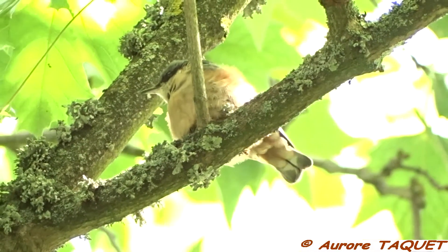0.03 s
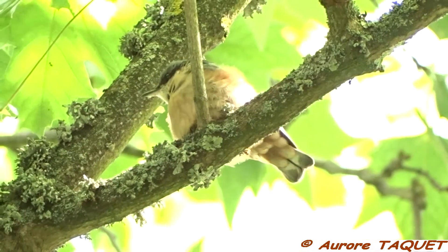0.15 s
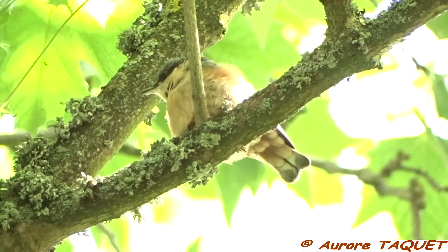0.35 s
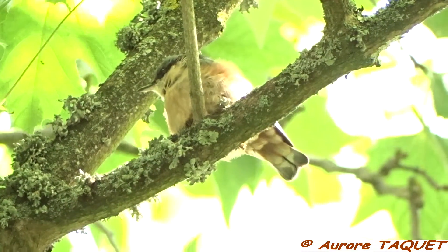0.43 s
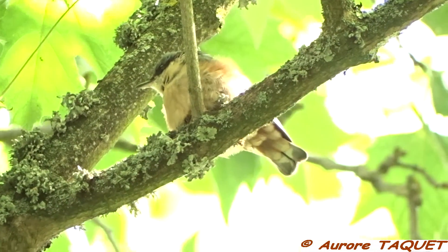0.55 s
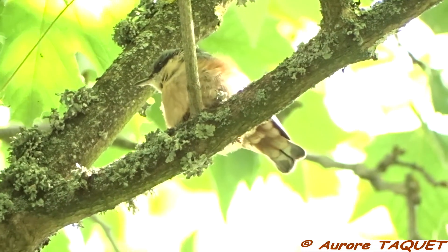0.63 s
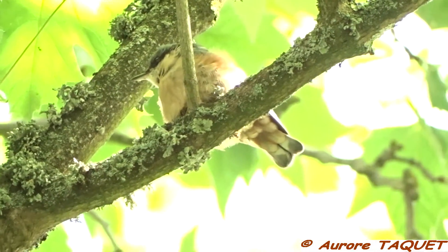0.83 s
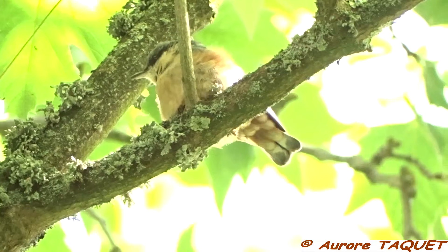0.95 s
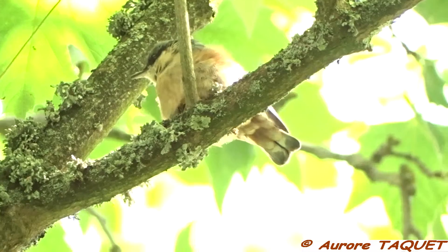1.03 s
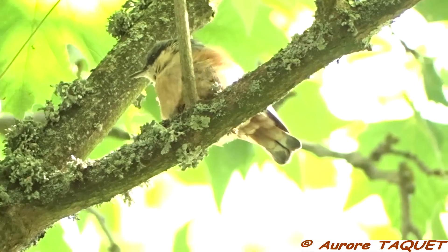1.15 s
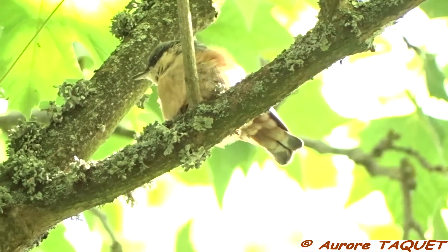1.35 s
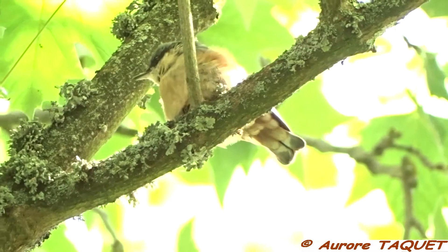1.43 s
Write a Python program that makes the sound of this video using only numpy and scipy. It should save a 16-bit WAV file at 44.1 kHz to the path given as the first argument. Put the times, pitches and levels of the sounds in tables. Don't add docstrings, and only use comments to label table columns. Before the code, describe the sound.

In a leafy tree, faint falling whistles lead to brief chirps and clear, trembling high whistles from several birds, with a short diffuse echo; afterwards mostly quiet hum, far traffic and low wind rumble remain outdoors.

```python
import sys
import numpy as np
from scipy import signal
from scipy.fft import rfft, irfft
from scipy.io import wavfile
from scipy.ndimage import uniform_filter1d

SR = 44100
rng = np.random.default_rng(int(sys.argv[2]) if len(sys.argv) > 2 else 0)


def volts(x):
    e = np.asarray(x, float) / 20
    return 10 ** e


def master(y):
    cut = np.clip(np.atleast_2d(y).T, -1, 1)
    pcm = np.round(cut * 32767)
    wavfile.write(sys.argv[1], SR, pcm.astype(np.int16))


N = 66150

# (start [s], length [s], top pitch [Hz], level [dB])
LONG_CHIRPS = [
    (.450, .078, 5450, -43),
    (.827, .074, 5460, -42),
]
# (start [s], length [s], top pitch [Hz], level [dB])
UPPER_CHIRPS = [
    (.196, .056, 6200, -52),
    (.464, .050, 6560, -51),
    (.846, .045, 6400, -56),
]
# (start [s], length [s], top pitch [Hz], level [dB])
SHORT_CHIRPS = [
    (.360, .024, 5150, -53),
    (.373, .028, 7250, -55),
    (.738, .023, 5250, -47),
    (1.486, .027, 5200, -50),
    (.169, .021, 6550, -54),
    (.437, .023, 6600, -54),
    (.810, .032, 6950, -57),
    (.918, .032, 5450, -54),
    (.876, .030, 5900, -55),
]
# (start [s], length [s], first pitch [Hz], last pitch [Hz], level [dB])
GLIDING_WHISTLES = [(.012, .022, 8500, 7950, -58), (.032, .030, 7950, 7550, -63),
                    (.113, .013, 7550, 6950, -60), (.122, .015, 7150, 5500, -59),
                    (.170, .026, 8150, 7880, -57), (.194, .062, 7850, 7680, -63),
                    (.418, .020, 8620, 8500, -56), (.770, .010, 5600, 5800, -60),
                    (.838, .012, 5500, 5750, -53), (.828, .016, 8100, 7450, -53),
                    (.724, .016, 8200, 8250, -60), (.875, .015, 9100, 9250, -59),
                    (.886, .012, 8950, 8750, -54), (.814, .010, 5600, 5800, -56),
                    (.896, .035, 8550, 8480, -47), (.884, .012, 7800, 8000, -54),
                    (.938, .030, 8250, 8050, -53), (.960, .010, 6750, 6700, -59)]
# (start [s], length [s], first pitch [Hz], last pitch [Hz], level [dB])
HOARSE_NOTES = [
    (.876, .075, 9150, 9000, -56),
    (.882, .075, 8750, 8350, -52),
    (.815, .060, 6300, 5700, -53),
    (.860, .090, 6500, 5500, -54),
]
# (time [s], pitch [Hz],
# level [dB])
CONTOUR_CALLS = [
    [(.182, 3300, -57), (.190, 4750, -55), (.202, 5220, -53), (.220, 5370, -49), (.244, 5400, -49),
     (.252, 5150, -58), (.262, 4400, -66)],
    [(.520, 8100, -56), (.526, 8020, -51), (.545, 7870, -45.5), (.565, 7960, -55.5), (.588, 8070, -43),
     (.603, 7950, -47.5), (.608, 7600, -60), (.614, 6700, -67)],
    [(.748, 7560, -64), (.770, 7570, -51), (.786, 7950, -44), (.800, 8080, -41), (.827, 8180, -42),
     (.833, 8200, -54), (.868, 8230, -52), (.876, 8200, -62)],
    [(.966, 7550, -59), (.973, 7555, -48), (1.001, 7580, -49.5), (1.017, 7850, -38.5), (1.043, 8110, -38.5),
     (1.065, 8050, -35), (1.082, 7850, -39), (1.087, 7400, -44), (1.094, 6500, -57)],
]
# (time [s], level [dB])
GUST_LEVEL = [(0.0, -74), (0.132, -62), (0.22, -60), (0.246, -68), (0.33, -44), (0.404, -59.5),
              (0.434, -78), (0.462, -63), (0.5, -56.5), (0.76, -65.5), (0.78, -70), (0.944, -70),
              (1.076, -47.5), (1.168, -50.5), (1.186, -47), (1.328, -50), (1.362, -65), (1.5, -56)]
# (time [s], peak level [dB], pitch [Hz])
PRESSURE_PUFFS = [(0.33, -45.5, 73.5), (.434, -52.5, 40), (0.513, -56, 50), (0.204, -56, 79),
                  (.710, -57, 56), (0.858, -53, 78.5), (.617, -54, 60), (0.788, -51, 69),
                  (1.064, -48.5, 55), (1.098, -48.5, 90), (1.197, -46, 142), (1.234, -47, 126),
                  (1.310, -71, 71)]
# (time [s], level [dB])
DRONE_SWELL = [
    (0.0, -69.5),
    (0.036, -67),
    (0.434, -66.5),
    (0.534, -61),
    (0.684, -64),
    (0.888, -59),
    (1.5, -60.5),
]
# (frequency [Hz], density [dB per Hz])
HUM_SPECTRUM = [(30, -5), (106, -7), (400, -13), (1200, -6.5), (1600, -7.5), (2100, -13.5), (6000, -13.5),
                (11000, -22.5)]
# (frequency [Hz], correlation [0..1])
HUM_LIKENESS = [(60, 1), (300, 1), (1000, 0.51), (3000, 0.61), (8000, 0.83)]
# (frequency [Hz], left minus right [dB])
HUM_BALANCE = [(60, 3.5), (220, -1), (820, 2.5), (3030, -2), (11200, -2)]

TIME = np.arange(N) / SR
OPPOSED = np.array([[1], [-1]])
TREMBLE_PER_S = 110
NOTE_EDGE_S = .004
MICROPHONE_TOP_HZ = 11020


def rms_one(x):
    return x / np.sqrt(np.mean(x ** 2) + 1e-20)


def drift(rate):
    r = np.exp(-2 * np.pi * rate / SR)
    noise = rng.standard_normal(N + 9000)
    return rms_one(signal.lfilter([1], [1, -2 * r, r * r], noise)[9000:])


def fade(t, length, edge_s):
    onset = np.sin(np.pi / 2 * np.clip(t / edge_s, 0, 1))
    release = np.sin(np.pi / 2 * np.clip((length - t) / edge_s, 0, 1))
    return onset * release


def whistle(hz, gain, wobble_hz):
    phase = 2 * np.pi * np.cumsum(hz + wobble_hz) / SR
    return np.sqrt(2) * gain * (np.sin(phase) + volts(-29) * np.sin(2 * phase))


def arched_chirps(rows, rise_hz, rise_s, fall_hz, fall_s, wobble):
    out = np.zeros(N)
    for start, length, top_hz, db in rows:
        t = np.clip(TIME - start, 0, length)
        sag = rise_hz * np.clip(1 - t / rise_s, 0, 1) ** 2.0
        sag = sag + fall_hz * np.clip(1 - (length - t) / fall_s, 0, 1) ** 2.0
        remaining = 1 - t / length
        level_db = db - 6 * sag / 1000 - 6 * remaining
        gain = volts(level_db) * fade(t, length, NOTE_EDGE_S)
        out += whistle(top_hz - sag - 200 * remaining, gain, wobble)
    return out


def straight_glides(rows, edge_s, wobble):
    out = np.zeros(N)
    for start, length, first_hz, last_hz, db in rows:
        t = np.clip(TIME - start, 0, length)
        hz = first_hz + (last_hz - first_hz) * t / length
        out += whistle(hz, volts(db) * fade(t, length, edge_s), wobble)
    return out


def contour_calls(wobble):
    out = np.zeros(N)
    for rows in CONTOUR_CALLS:
        s, hz, db = np.transpose(rows)
        pitch = uniform_filter1d(np.interp(TIME, s, hz), size=200)
        gain = volts(np.interp(TIME, s, db)) * fade(TIME - s[0], s[-1] - s[0], NOTE_EDGE_S)
        out += whistle(pitch, gain, wobble)
    return out


def birds():
    wobble = 42 * drift(TREMBLE_PER_S)
    hoarse_wobble = 260 * drift(120)
    out = arched_chirps(LONG_CHIRPS, 1750, .024, 1750, .026, wobble)
    out += arched_chirps(UPPER_CHIRPS, 1000, .022, 500, .035, wobble)
    out += arched_chirps(SHORT_CHIRPS, 2300, .010, 2200, .010, wobble)
    out += straight_glides(GLIDING_WHISTLES, NOTE_EDGE_S, wobble)
    out += straight_glides(HOARSE_NOTES, .015, hoarse_wobble)
    out += contour_calls(wobble)
    return out * volts(2.6 * drift(TREMBLE_PER_S))


def foliage(calls):
    low_t60_s, high_t60_s, build_s = .5, .34, .006
    t = np.arange(SR // 2 + SR // 4) / SR
    white = rng.standard_normal((2, len(t)))
    low = signal.sosfiltfilt(signal.butter(6, 6800, fs=SR, output="sos"), white)
    tail = low * volts(1.5 - 60 * t / low_t60_s) + (white - low) * volts(-60 * t / high_t60_s)
    tail = tail * (1 - np.exp(-t / build_s))
    mid, side = [signal.fftconvolve(calls, h / np.sqrt(np.sum(h ** 2)))[:N] for h in tail]
    stir_db = 1.8 * np.clip(drift(30), -3, 1)
    return volts(-1.5 + stir_db) * (mid + volts(-14) * side * OPPOSED)


def wind():
    band = signal.butter(2, [40, 140], "band", fs=SR, output="sos")
    mid, side = rms_one(signal.sosfilt(band, rng.standard_normal((2, N + SR)))[:, SR:])
    gust = volts(np.interp(TIME, *np.transpose(GUST_LEVEL)) - 7.5)
    out = gust * (mid + 0.63 * side * OPPOSED)
    chance = rng.uniform(-0.79, 1, (len(PRESSURE_PUFFS), 2))
    for (s, db, hz), (turn, lean) in zip(PRESSURE_PUFFS, chance):
        cycles = (TIME - s) * hz
        bell = np.exp(-(cycles / 0.63) ** 2)
        puff = volts(db) * bell * np.cos(2 * np.pi * cycles + np.pi * turn)
        out = out + puff * (1 + 0.37 * lean * OPPOSED)
    return out


def drone():
    band = signal.butter(2, [352, 748], "band", fs=SR, output="sos")
    mid, side = rms_one(signal.sosfilt(band, rng.standard_normal((2, N))))
    swell = volts(np.interp(TIME, *np.transpose(DRONE_SWELL)) - 3.5)
    return swell * (mid + 0.72 * side * OPPOSED)


def at_hz(points, hz):
    table = np.array(points)
    return np.interp(np.log(hz), np.log(table[:, 0]), table[:, 1])


def hum():
    hz = np.maximum(np.fft.rfftfreq(N, 1 / SR), 20)
    mid, side = rfft(rng.standard_normal((2, N)))
    alike = np.clip(at_hz(HUM_LIKENESS, hz), 0, 1)
    lean_db = at_hz(HUM_BALANCE, hz) / 2
    pair = np.sqrt(1 + alike) * mid + np.sqrt(1 - alike) * side * OPPOSED
    pair = pair * volts(at_hz(HUM_SPECTRUM, hz) + lean_db * OPPOSED)
    out = irfft(pair * (hz < MICROPHONE_TOP_HZ), N)
    return volts(-57.5) * out / np.sqrt(np.mean(out.mean(axis=0) ** 2))


def scene():
    calls = birds()
    tree = (calls + foliage(calls)) * volts(1.3 / 2 * OPPOSED)
    return tree + hum() + wind() + drone()


def roll_off(x):
    return signal.sosfilt(signal.butter(12, 11810, fs=SR, output="sos"), x)


def record(dry):
    low_pass = signal.ellip(14, .3, 80, MICROPHONE_TOP_HZ, fs=SR, output="sos")
    mix = signal.sosfilt(low_pass, dry)
    return roll_off(mix)


dry = scene()
out = record(dry)
master(out)
```